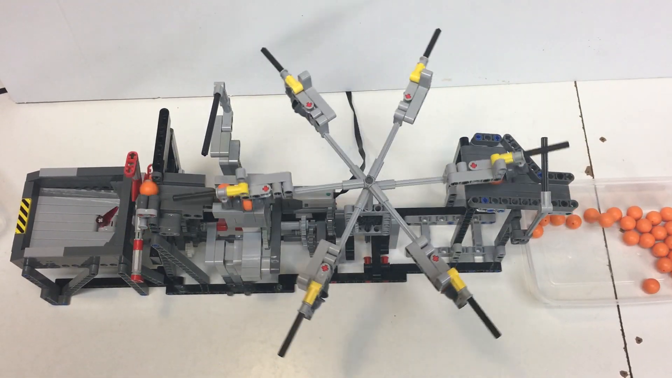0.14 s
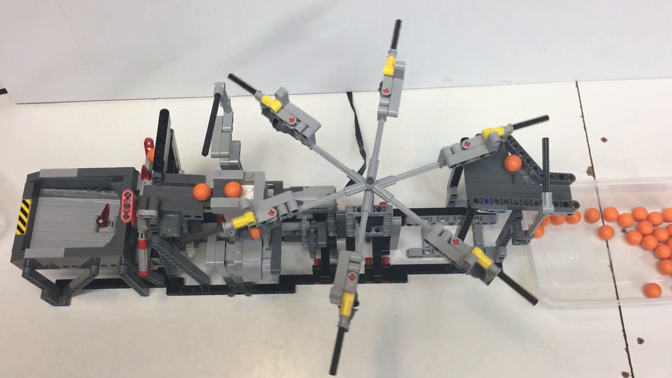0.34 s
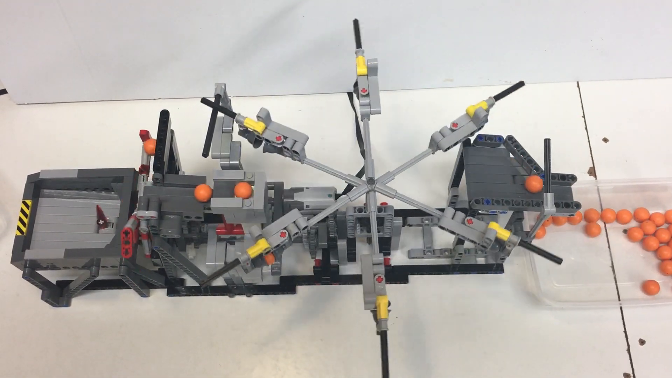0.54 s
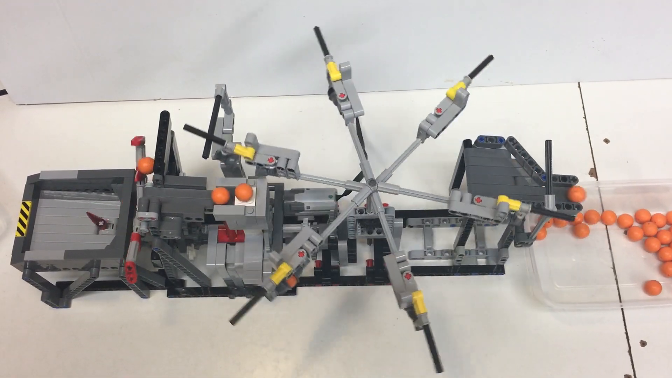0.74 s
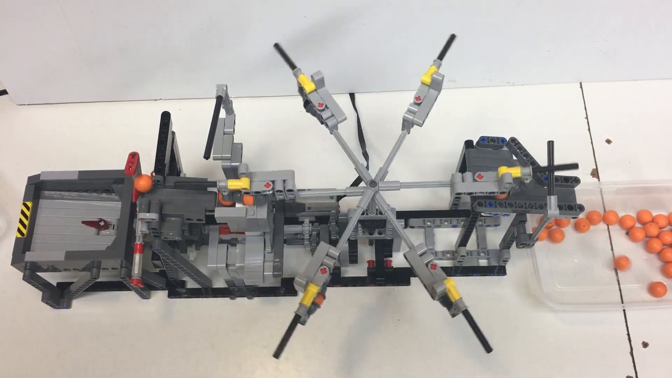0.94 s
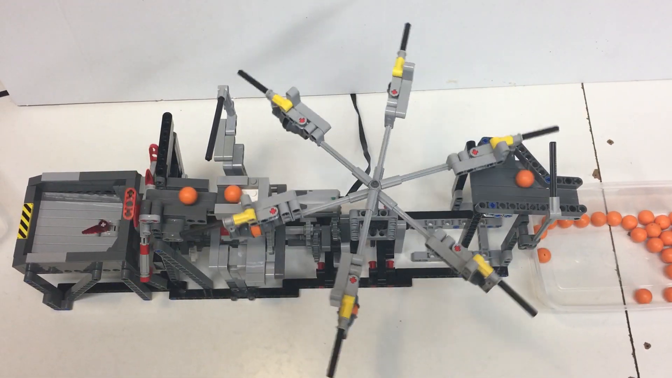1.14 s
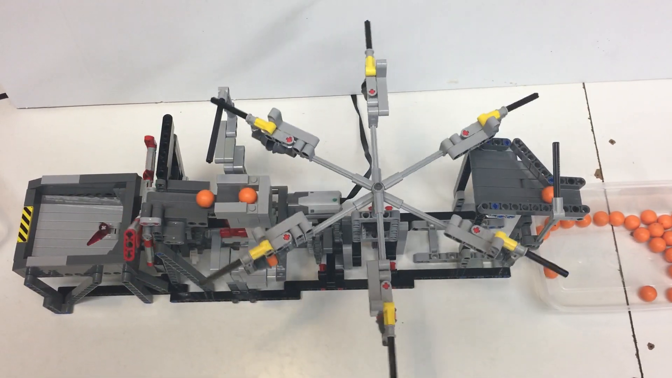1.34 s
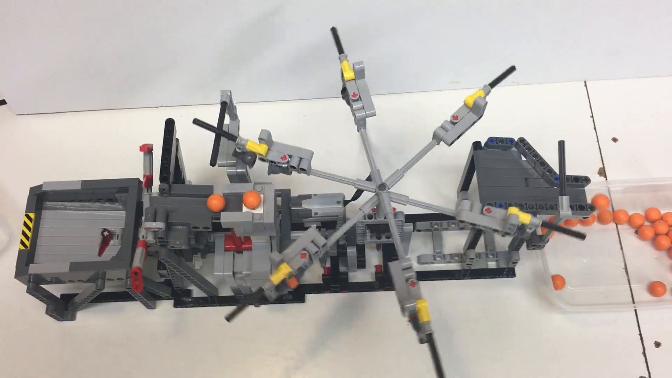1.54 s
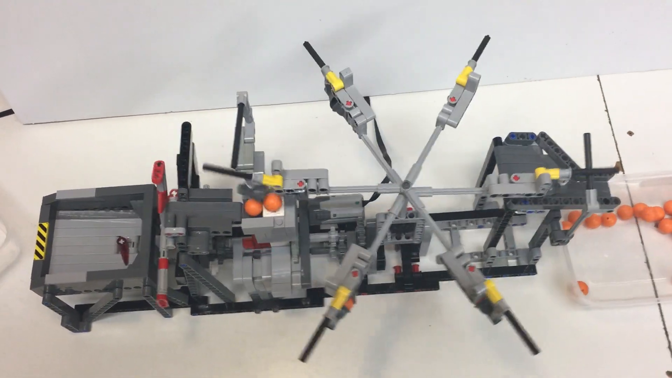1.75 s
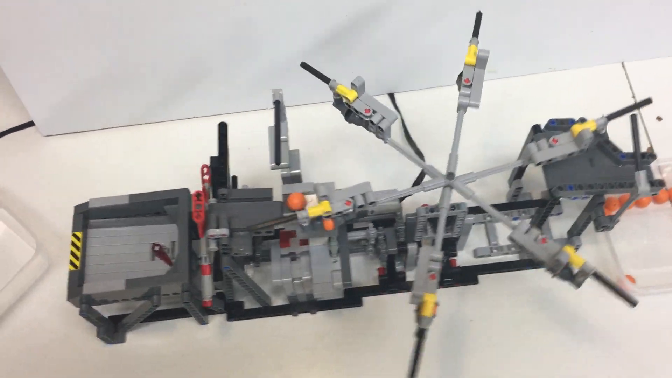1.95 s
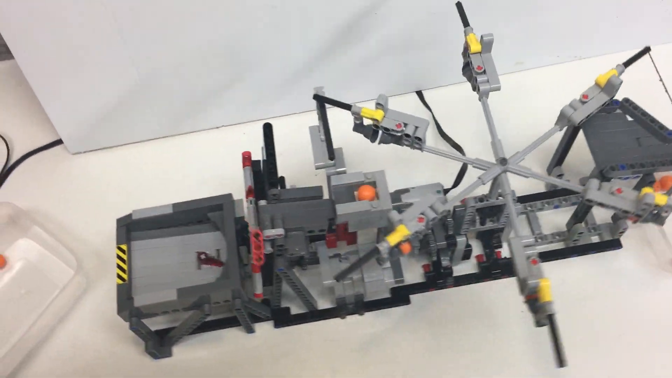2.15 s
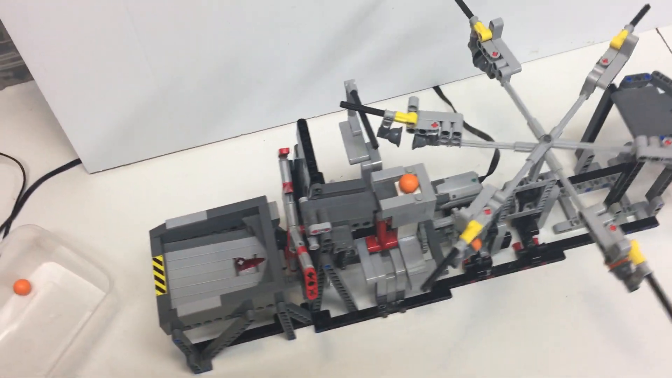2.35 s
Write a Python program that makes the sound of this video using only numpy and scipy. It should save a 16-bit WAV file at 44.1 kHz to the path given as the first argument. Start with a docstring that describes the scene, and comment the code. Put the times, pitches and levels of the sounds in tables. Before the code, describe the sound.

A toy plastic brick machine runs throughout, its small motor whirring in hissy treble over a faint hum and dense gear ticking. Hard double-struck snaps crack at about 0.2, 1.0 and 1.76 seconds. After each, hard little balls clack and roll, busiest at 0.25-0.5, 1.0-1.25 and 1.9-2.03 seconds. Between them only faint clicks remain. Close, dry table sound with a short room tail; the drive softens slightly near the end.

```python
"""On a table in a room, close to a small microphone, a toy machine of plastic bricks turns a wheel of gripper arms.
A motor whirs and hums as noise; gear teeth tick as random clicks ringing the housing, over a low rumble.
At every turn step a gripper snaps: the brick frame rings, thuds and cracks, struck twice.
Small balls drop, bounce and roll through plastic chutes as blows that ring the small parts.
The table and the room throw each knock back."""
import sys
import numpy as np
from scipy import signal
from scipy.fft import rfft, irfft
from scipy.io import wavfile
from scipy.ndimage import uniform_filter1d

SR = 44100
rng = np.random.default_rng(int(sys.argv[2]) if len(sys.argv) > 2 else 0)


def gain_from_db(level_db):
    """Turn a decibel level (scalar or array-like) into a linear amplitude factor."""
    decades = np.asarray(level_db, float) / 20
    return 10 ** decades


def unload_audio(sound):
    """Save the sound as a 16-bit wav file, at the path given as the first command line argument."""
    columns = np.transpose(np.atleast_2d(sound))
    # keep every value between -1 and 1, then stretch to whole-number steps
    steps = np.round(np.clip(columns, -1, 1) * 32767)
    wavfile.write(sys.argv[1], SR, steps.astype(np.int16))


N = 110250
THUD_BELOW_HZ = 700  # modes below this make up the thud of a blow


def unit_rms(x):
    """Scales a sound to an rms of one."""
    return x / np.sqrt(np.mean(x ** 2) + 1e-20)


def read(points, hz):
    """Reads a table of (frequency, value) on a log frequency axis."""
    f, value = np.transpose(points)
    return np.interp(np.log(hz + 1), np.log(f + 1), value)


def curve(points):
    """Draws a table of (time, level) as a line through the whole scene."""
    return np.interp(np.arange(N) / SR, *np.transpose(points))


def add(mix, start_s, sound):
    """Lays a sound into the mix in place, cut off at the end."""
    part = mix[round(start_s * SR):][:len(sound)]
    part += sound[:len(part)]


def noise(spectrum, patch_db):
    """Noise from random short-time spectra, with patches of level drifting in time and frequency."""
    real, imag, patches = rng.standard_normal((N // 256 + 5, 513, 3)).T
    patches = uniform_filter1d(patches, size=12, axis=0)
    patches = unit_rms(uniform_filter1d(patches, size=6, axis=1))
    shape_db = read(spectrum, np.fft.rfftfreq(1024, 1 / SR))[:, None]
    frames = (real + 1j * imag) * gain_from_db(shape_db + patch_db * patches)
    return unit_rms(signal.istft(frames, nperseg=1024, noverlap=768)[1][:N])


def clicks(per_s, spread_db):
    """A random train of clicks, most small, a few large."""
    sizes = gain_from_db(spread_db * np.minimum(rng.exponential(1, N), 4))
    return sizes * (rng.random(N) < per_s / SR)


def rings(hz, db, t60, step=1):
    """One swelling, dying sine for each mode; each mode is scaled by step against the one before."""
    t = np.arange(4096)[:, None] / SR
    swell = 1 - np.exp(-t * hz)  # time constant of one cycle
    fade = gain_from_db(db - 60 * t / t60)
    return (swell * step ** np.arange(len(hz)) * fade * np.sin(2 * np.pi * hz * t)).T


# single echoes off the table and wall: (delay [s], level [dB])
ECHOES = [(.0021, -12), (.0046, -14), (.0075, -13.5), (.011, -17)]
# how fast the room dies away: (frequency [Hz], t60 [s])
ROOM_T60 = [(300, 0.44), (1500, 0.2), (5000, 0.26), (14000, 0.2)]


def room(x):
    """A direct path and a few single echoes, then sparse taps dying band by band."""
    tail_db = -11.5
    taps = np.zeros(SR // 2)
    at = np.arange(400, SR // 2 - 20, 20)
    taps[at + rng.integers(0, 20, len(at))] = rng.choice([-1., 1.], len(at))
    hz, t, bands = signal.stft(taps, SR, nperseg=256)
    fade = gain_from_db(-60 * t / read(ROOM_T60, hz)[:, None])
    tail = signal.istft(bands * fade, SR, nperseg=256)[1]
    response = gain_from_db(tail_db) * tail / np.linalg.norm(tail)
    for delay_s, db in [(0.00026, 0)] + ECHOES:  # the direct path comes first
        add(response, delay_s, gain_from_db([db]))
    return signal.fftconvolve(x, response)[:N]


# colour of the low rumble: (frequency [Hz], relative level per Hz [dB])
RUMBLE = [(20, -15), (40, -11), (63, -10), (85, 1.5), (130, -1.5), (175, -6), (300, -8.5), (500, -12),
          (900, -47)]


def rumble():
    """Steady low noise under everything."""
    return gain_from_db(-60) * noise(RUMBLE, patch_db=0.5)


# wavering motor tones: (frequency [Hz], width [Hz], level [dB])
HUM = [(62, 10, -65.5), (135.6, 6.8, -64), (863, 13, -70.5)]


def hum():
    """Motor hum: narrow bands of noise, each a wavering tone."""
    f = np.fft.rfftfreq(N, 1 / SR)
    out = np.zeros(N)
    for hz, width, db in HUM:
        resonance = 1 / (1 + (2 * (f - hz) / width) ** 2)
        out += gain_from_db(db) * unit_rms(irfft(rfft(rng.standard_normal(N)) * resonance, N))
    return out


# colour of the motor whir: (frequency [Hz], relative level per Hz [dB])
WHIR = [(300, -10), (600, -15), (870, -19.5), (1200, -7), (1950, -8), (2450, -2.5), (2800, -22), (3200, 1),
        (3760, 0), (5800, 0), (7600, -4), (8400, -6), (10300, -9), (12600, -4), (13800, -9), (16000, -9.5)]


def whir():
    """The motor's broad, gently patchy noise at unit rms."""
    return noise(WHIR, patch_db=2)


# gear housing modes: (frequency [Hz], width before widening [Hz], level before the width is added [dB])
GEARS = [(1980, 62, -2), (2330, 190, -9), (2850, 69, -55), (3700, 44, 3), (4620, 430, 7), (5850, 320, 5.5),
         (8820, 93, -1.5), (9440, 170, -15.5), (12500, 2900, 4.5)]


def gear_ticks():
    """Teeth tick into the housing: shared clicks strike every mode, lone clicks only one."""
    ticks_per_s, lone_per_s, spread_db, lone_db = 260, 54, 4, 4.5
    hz, width, db = np.transpose(GEARS)
    width = 2.2 * width  # a wider mode dies sooner
    shared = clicks(ticks_per_s, spread_db)
    out = np.zeros(N)
    for mode in rings(hz, db + 10 * np.log10(width), 2.4 / width):
        # each shared tick strikes each mode with its own random strength
        strikes = shared * rng.standard_normal(N) + gain_from_db(lone_db) * clicks(lone_per_s, spread_db)
        out += signal.oaconvolve(strikes, mode)[:N]
    return unit_rms(out)


# drive loudness as the microphone moves: (time [s], level [dB])
NEAR = [(0, -47.5), (.6, -47), (1.3, -47), (1.9, -48), (2.2, -49), (2.5, -48.5)]


def drive():
    """Gear ticks over the motor whir, with a hollow in the spectrum, perhaps the table's echo."""
    whir_over_ticks_db = 1
    hollow_hz, hollow_width_hz, hollow_depth = 2800, 280, 0.65
    both = gear_ticks() + gain_from_db(whir_over_ticks_db) * whir()
    off = (np.fft.rfftfreq(N, 1 / SR) - hollow_hz) / hollow_width_hz
    hollow = 1 - hollow_depth * np.exp(-off ** 2)
    return gain_from_db(curve(NEAR)) * irfft(rfft(both) * hollow, N)


# colour of the crack of a blow: (frequency [Hz], relative level per Hz [dB])
CRACK = [(1500, -13), (2600, -30), (3400, -11), (5200, 8.5), (6800, 3.5), (8000, 2), (9000, 1),
         (10200, -9.5), (12200, 0.5), (14500, -20), (16500, -12.5)]


def crack(spike):
    """A sharp spike with a very short hiss and a faint scatter after it, mostly treble."""
    level_db, hiss_t60_s, scatter_db, scatter_t60_s = 6.5, 0.0097, -18, 0.1
    t = np.arange(4096) / SR
    fade = gain_from_db(-60 * t / hiss_t60_s) + gain_from_db(scatter_db - 60 * t / scatter_t60_s)
    burst = 0.29 * rng.standard_normal(4096) * fade
    burst[4000:] = 0
    burst[0] = spike
    colour = gain_from_db(read(CRACK, np.fft.rfftfreq(4096, 1 / SR)))
    # shifted while filtered, so that what spreads ahead of the spike can be cut
    out = np.roll(irfft(rfft(np.roll(burst, 64)) * colour), -64)
    out[-64:] = 0
    return gain_from_db(level_db) * out / np.linalg.norm(out)


# small plastic parts before each blow's scatter: (frequency [Hz], level [dB], t60 [s])
PARTS = [(260, -4, .035), (420, 0, .03), (950, -2, .018), (1140, -2, .015), (1400, 0, .012),
         (1620, -2, .011), (1850, 0, .011), (2180, 0, .011), (2450, 0, .01), (2700, -2, .01),
         (3010, -2, .009), (3720, -3, .015), (4680, 0, .01), (5780, 0, .008), (6600, -4, .007),
         (8600, -5, .006)]


def part_modes(centre_hz, thud_db):
    """Modes near the centre ring most; where the blow lands changes each a little."""
    off_centre_db_per_oct2, spot_db, detune = -11, 2, 0.04
    hz, db, t60 = np.transpose(PARTS)
    spot, shift = rng.standard_normal((2, len(hz)))
    off_centre_db = off_centre_db_per_oct2 * np.log2(hz / centre_hz) ** 2
    db = db + np.where(hz < THUD_BELOW_HZ, thud_db, off_centre_db)
    return rings(hz * (1 + detune * shift), db + spot_db * spot, t60)


def knock(level_db, centre_hz, crack_db, thud_db):
    """One blow on the small parts, with a few loose contacts after it."""
    chatter_db, chatter_t60_s = -33, 0.015
    t = np.arange(1024) / SR
    blow = rng.standard_normal(1024) ** 3 * gain_from_db(chatter_db - 60 * t / chatter_t60_s)  # cubed: a few stand out
    blow[0] = 1
    ring = np.convolve(blow, part_modes(centre_hz, thud_db).sum(0))[:4096]
    ring = unit_rms(ring) * np.sqrt(SR / 1000 / len(ring))  # energy of 1 ms at unit rms
    return gain_from_db(level_db) * (ring + gain_from_db(crack_db) * crack(spike=1.0))


# balls rolling and chattering: (time [s], level [dB])
ROLL = [(0, -54.5), (.2, -52), (.22, -33.5), (.27, -45.5), (.34, -49), (.36, -45), (.42, -48.5), (.5, -51),
        (.53, -55.5), (.78, -53.5), (1.0, -58), (1.02, -40), (1.09, -42.5), (1.13, -41), (1.2, -48.5),
        (1.3, -45), (1.37, -56.5), (1.63, -54.5), (1.75, -61), (1.775, -32.5), (1.82, -56), (1.85, -51),
        (1.9, -57), (1.925, -38.5), (1.97, -49.5), (2.0, -46), (2.05, -51), (2.07, -58), (2.5, -52.5)]


def rolling(count=24):
    """Rolling balls: tiny bounces of many colours, each colour with its own train of clicks."""
    middle_hz, scatter_oct = 1800, 0.5
    bounces_per_s, spread_db = 1300, 3.5  # the rate is shared among the colours
    out = np.zeros(N)
    for centre_hz in middle_hz * 2 ** (scatter_oct * np.linspace(-1, 1, count)):
        train = clicks(bounces_per_s / count, spread_db)
        bounce = knock(0, centre_hz, crack_db=-1, thud_db=-14)
        out += signal.oaconvolve(train, bounce)[:N]
    return gain_from_db(curve(ROLL)) * unit_rms(out)


# ball and lever knocks: (time [s], level [dB], where the parts ring most [Hz], crack [dB], thud [dB])
KNOCKS = [(.025, -35.5, 3000, 1, -16), (0.044, -29.5, 3780, 7, -36), (.183, -35, 8500, -10, -28),
          (.249, -25.5, 2110, -1, -27), (0.259, -27.5, 3980, 9.5, -20), (0.296, -23.5, 2240, 5, -14.5),
          (.318, -36, 3750, -11, -30), (0.328, -29, 3000, -14, -25), (0.3456, -14.5, 2060, 0.5, -14),
          (0.366, -25, 2200, -6, -22), (0.376, -28.5, 2170, -12, -29), (0.3923, -18.5, 1960, 3, -9.5),
          (0.403, -29.5, 2530, -3, -23), (0.436, -29.5, 5940, -4, -17), (0.4397, -20.5, 2140, 2, -20),
          (.466, -33, 2500, -6, -9), (.474, -32, 2500, -5, -12), (.478, -26.5, 2260, 5.5, -14),
          (.490, -29, 3800, -8, -16.5), (0.552, -37.5, 4100, -10, -25), (.582, -39, 4400, 11, -30),
          (.641, -40, 3700, -17, -25), (.662, -37, 3700, -15, -29), (0.69, -37, 1090, -24, -30),
          (0.73, -32.5, 4170, -8, -16.5), (0.8332, -32.5, 3700, -17, -16), (0.892, -29, 4200, 8, -22),
          (1.019, -13.5, 2590, 4, -8.5), (1.055, -26.5, 1210, 4.5, -15), (1.071, -27.5, 2500, -10, -16),
          (1.117, -24, 3900, 5.5, -29), (1.119, -19.5, 1800, 2.5, -18), (1.143, -20.5, 2220, 4, -12.5),
          (1.176, -32, 3000, -5, -20), (1.184, -19.5, 2300, -1.5, -20), (1.2279, -28.5, 1800, -12, -11.5),
          (1.131, -27, 2030, -21, -28), (1.261, -30, 5600, 11.5, -6), (1.323, -29, 3930, 8, -29),
          (1.348, -38, 3700, 9, -25), (1.498, -41, 1960, -15, -31), (1.518, -38, 3960, -19, -25),
          (1.626, -33.5, 2060, 0, -17), (1.741, -33, 3430, -13, -20), (1.801, -27, 2370, 1, -21),
          (1.858, -41, 4000, -8, -25), (1.881, -34.5, 8500, -8, -25), (1.914, -25.5, 2180, 0.5, -9.5),
          (1.922, -17.5, 1940, 3.5, -11), (1.944, -30, 2480, 3, -18), (1.953, -37, 6000, 11, -21),
          (1.984, -45, 4400, 0, -30), (1.987, -19.5, 2280, -2.5, -21), (2.022, -32, 1980, 5, -31),
          (2.027, -34, 3800, -18, -15), (2.080, -42, 4600, -4, -23), (2.114, -37.5, 3000, 17.5, -32),
          (2.200, -41, 4100, 2, -31), (2.262, -40, 4200, 12, -35), (2.369, -38.5, 3700, 13.5, -25)]


def knocks():
    """Balls and levers strike the small parts one by one."""
    out = np.zeros(N)
    for start_s, *blow in KNOCKS:
        add(out, start_s, knock(*blow))
    return out


# brick frame modes: (frequency [Hz], level before the thud is added [dB], t60 before the cap [s])
FRAME = [(247.5, -14.5, 0.15), (338, -2.5, 0.017), (382.7, -5.5, 0.037), (534, -12, 0.032),
         (763, -12, 0.025), (1037, -6.5, 0.042), (1064, -1, 0.012), (1355, 5, 0.025), (1420, -24, 0.012),
         (1710, 4.5, 0.012), (1976, -0.5, 0.047), (2200, -2, 0.027), (2390, 3, 0.0098), (2576, -9.5, 0.089),
         (3000, -1.5, .02), (3300, -4.5, 0.02)]


def snap(level_db, thud_db, crack_db):
    """The frame rings with a thud below and a crack above, and the gripper strikes a second time."""
    t60_max_s, rebound_s, rebound_db = 0.07, 0.0047, -9
    hz, db, t60 = np.transpose(FRAME)
    db = db + thud_db * (hz < THUD_BELOW_HZ)
    # neighbouring modes start in opposite phase, each scaled a little further down
    ring = rings(hz, db, np.minimum(t60, t60_max_s), step=-0.92).sum(0)
    once = gain_from_db(level_db) * (ring / abs(ring).max() + gain_from_db(crack_db) * crack(spike=2.6))
    twice = once.copy()
    add(twice, rebound_s, gain_from_db(rebound_db) * once)
    return twice


# gripper snaps: (time [s], level [dB], thud [dB], crack [dB])
SNAPS = [(.208, -9.5, -3.5, 3), (1.005, -12, -2, 3), (1.761, -10, -3.5, 4.5)]


def snaps():
    """A gripper snaps at every turn step."""
    out = np.zeros(N)
    for start_s, *blow in SNAPS:
        add(out, start_s, snap(*blow))
    return out


def scene():
    """All blows, low-cut and thrown back by the room, over the drive, hum and rumble."""
    hits = rolling() + snaps() + knocks()
    low_cut = signal.butter(4, 176, "high", fs=SR, output="sos")
    hits = signal.sosfilt(low_cut, hits)
    return (room(hits) + drive() + hum() + rumble())[None]


def roll_off(x):
    """The treble ends steeply here."""
    return signal.sosfilt(signal.butter(12, 16810, fs=SR, output="sos"), x)


def record(dry):
    """Ends the treble steeply near 15.7 kHz and finishes the mix."""
    band_limit = signal.firwin(511, 15720, window=("kaiser", 5), fs=SR)
    mix = signal.oaconvolve(dry, band_limit[None], "same")
    return roll_off(mix)


dry = scene()
out = record(dry)
unload_audio(out)
```